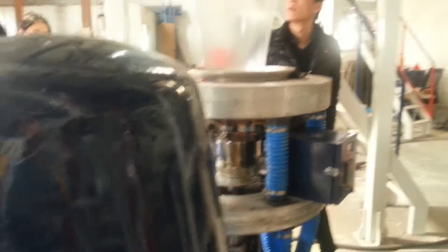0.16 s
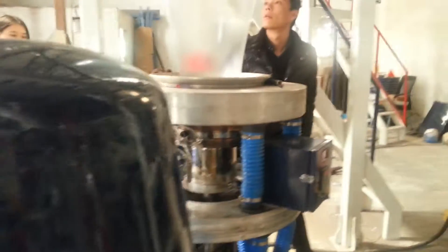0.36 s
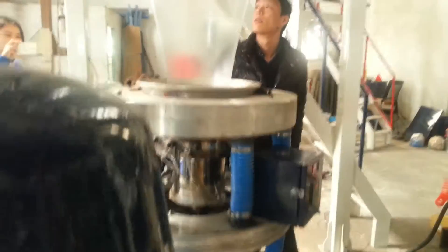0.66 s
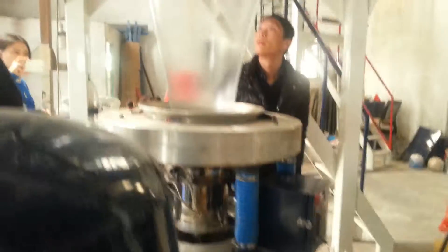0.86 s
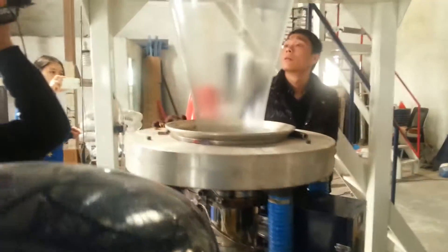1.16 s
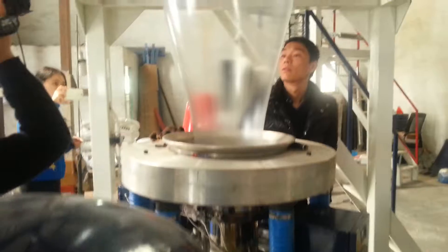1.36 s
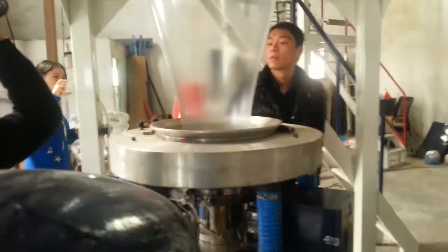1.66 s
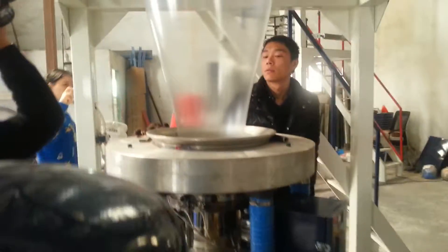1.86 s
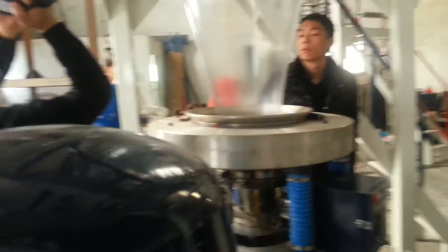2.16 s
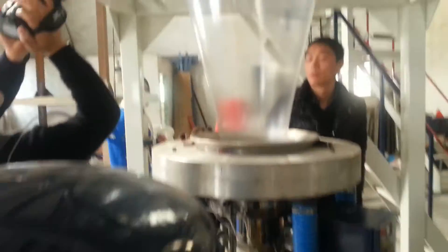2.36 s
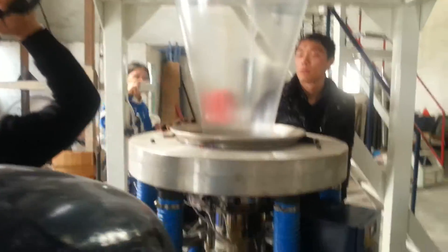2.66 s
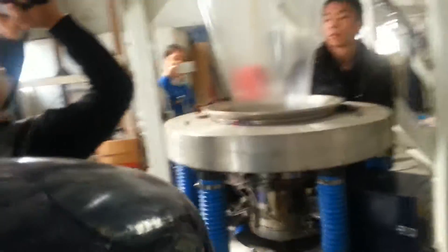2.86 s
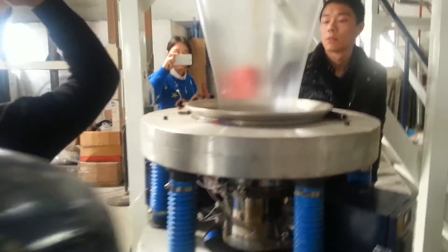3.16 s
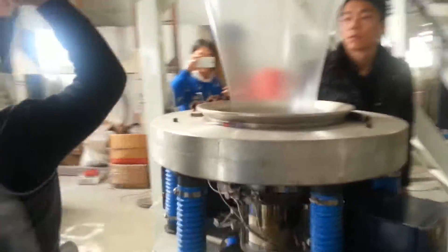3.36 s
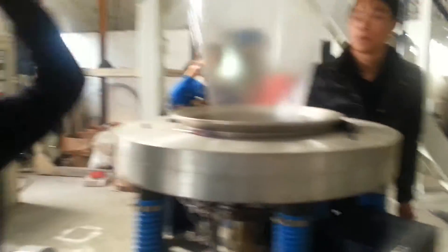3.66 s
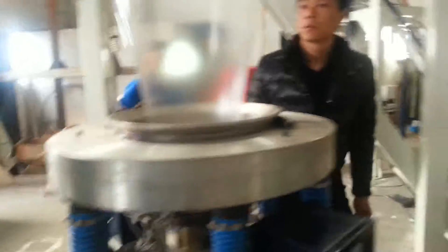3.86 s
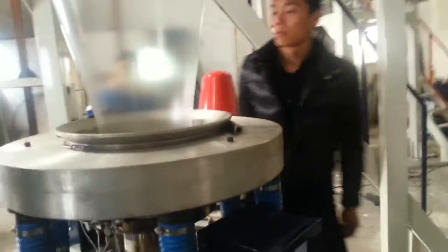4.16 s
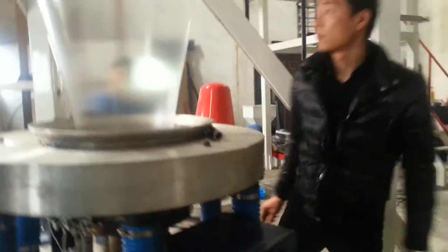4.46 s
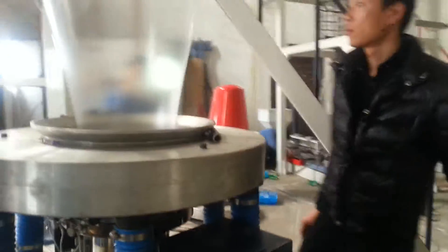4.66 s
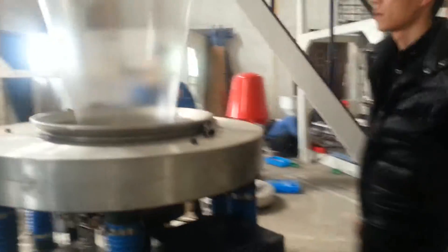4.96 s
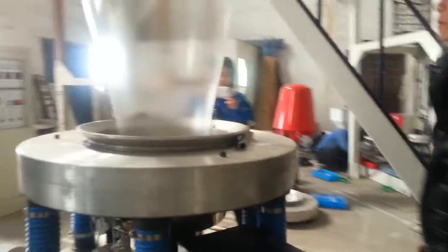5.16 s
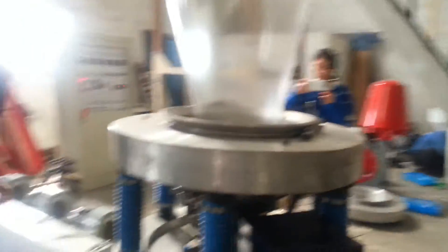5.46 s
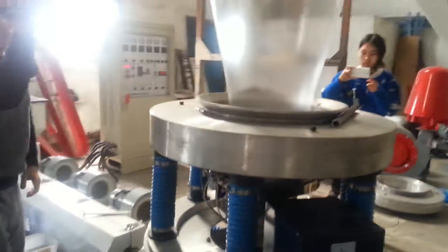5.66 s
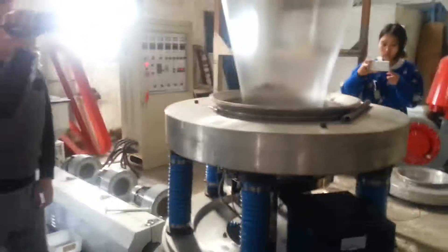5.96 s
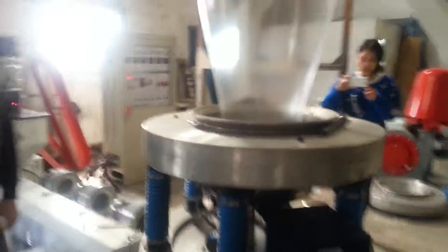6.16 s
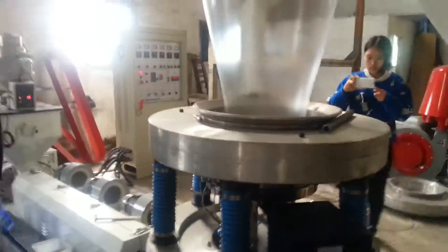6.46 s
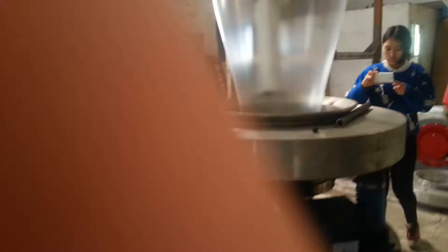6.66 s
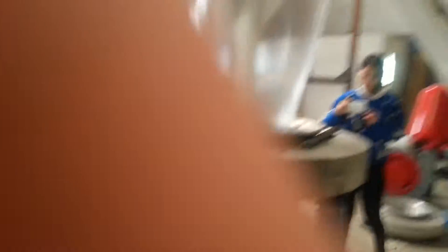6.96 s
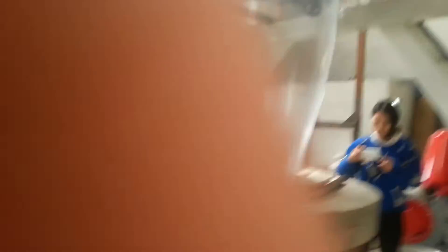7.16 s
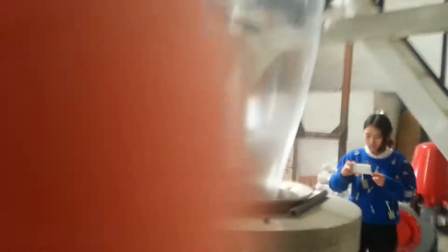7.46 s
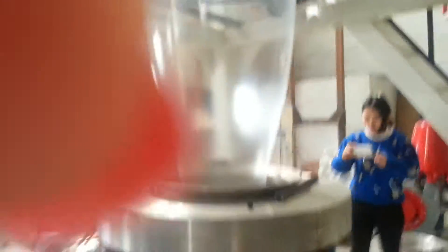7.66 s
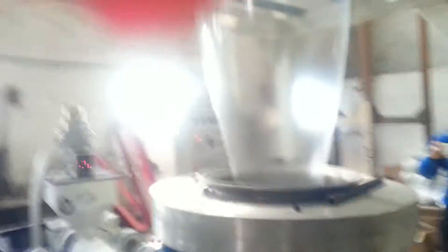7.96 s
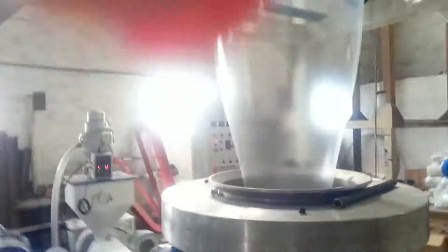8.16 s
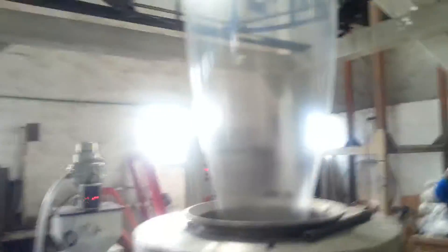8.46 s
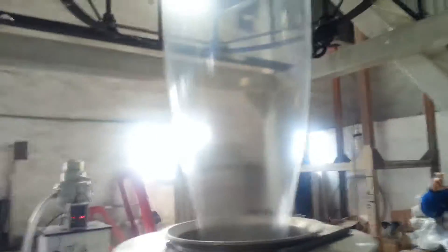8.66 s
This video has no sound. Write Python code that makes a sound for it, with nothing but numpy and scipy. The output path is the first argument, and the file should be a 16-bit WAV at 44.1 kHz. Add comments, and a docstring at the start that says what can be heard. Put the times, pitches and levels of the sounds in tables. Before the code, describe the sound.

A factory machine runs steadily with a high whistling air hiss over a low motor hum in a large hall.

```python
"""A whistling hiss and a steady hum come first: a blown-film extruder running in a large hall,
heard from a pair of microphones carried round it. Motor and blower hum, air rumbles in the hoses
and hisses from the slit of the cooling ring, and the speed drive whines near 8 kHz.
A faint falling squeal passes once, near three seconds. The right microphone is screened
from the hiss until the listener turns, about six seconds in."""
import sys
import numpy as np
from scipy import signal
from scipy.fft import rfft, irfft, next_fast_len
from scipy.io import wavfile
from scipy.ndimage import uniform_filter1d, minimum_filter1d, map_coordinates

SR = 44100
rng = np.random.default_rng(int(sys.argv[2]) if len(sys.argv) > 2 else 0)


def store_pcm(level_fs):
    """Save levels as 16-bit WAV."""
    pcm = np.round(np.clip(level_fs, -1, 1) * 32767).astype(np.int16)
    wavfile.write(sys.argv[1], SR, np.atleast_2d(pcm).T)


N = 388080

# Levels in the tables are relative: each source adds its own gain. Balance is left over right.
# Whistling hiss of the slit. Each row: time in seconds, core level in dB, skirt level in dB.
SLIT_LEVELS = [(0.0, -15.5, -26), (1.8, -15.5, -24.5), (2.05, -15.5, -27), (2.45, -18, -21.5),
               (6.3, -16, -23), (6.7, -22, -19), (7.1, -23, -26), (7.5, -21, -29), (8.2, -20.0, -30),
               (8.8, -19, -26.0)]
# Colour of its core and of its wider skirt. Each row: frequency in Hz, level in dB.
SLIT_CORE_COLOUR = [(5400, -26), (5700, 3.5), (5830, 5.5), (6270, 8.5), (6420, -4), (6700, -29)]
SLIT_SKIRT_COLOUR = [(4400, -35), (4900, -6.5), (5300, -5), (5480, 4), (5750, -2), (6300, -20), (6500, 4.5),
                     (6750, -5), (7000, -14), (7800, -39)]
# The hiss moves with the listening angle. Each row: time in seconds, nominal centre in Hz.
SLIT_NOMINAL_CENTRE = [(0.0, 6124), (0.54, 6010), (5.37, 6036), (5.83, 5940), (7.01, 6275), (7.65, 6013),
                       (8.8, 6422)]
# Screening of the right microphone; each hiss takes a share. Each row: time in seconds, loss in dB.
RIGHT_SHADE = [(0.0, 14), (0.6, 16), (1.55, 10.5), (2.05, 15.0), (3.25, 16), (3.4, 18.5), (4.7, 16),
               (5.8, 17.5), (6.55, 4.0), (7.3, 2.5), (7.65, 10.5), (8.8, 5)]
# Fine spray of air and its narrowly beamed top. Each row: time in seconds, level in dB.
SPRAY_LEVEL = [(0, -36), (1.6, -37), (3.2, -36.5), (4.1, -39.5), (5.2, -40), (5.95, -41), (6.4, -37.6),
               (7.1, -37.5), (8.4, -36.5)]
SIZZLE_LEVEL = [(0, -37.5), (2.3, -38.5), (3.1, -42.6), (3.6, -65), (5.4, -71), (7.3, -57), (8.1, -68),
                (8.45, -37), (8.8, -39.8)]
# Their colours. Each row: frequency in Hz, level in dB.
SPRAY_SPECTRUM = [(3500, -20.5), (5200, -28), (6200, 0), (7300, 3.5), (7700, 1.5), (8400, -4.5),
                  (9200, -10.5), (10000, -15.5), (11500, -28), (13000, -75), (14400, -57)]
SIZZLE_SPECTRUM = [(8000, -2), (9500, -3.5), (10800, 2.5), (11600, -4), (12500, -6.5), (14400, -10)]

# Motor hum, walking through its standing waves. Each row: time in seconds, level in dB.
MOTOR_LEVEL = [(0.0, -21.0), (1.1, -23), (1.3, -21), (2.45, -20.5), (2.85, -21), (3.35, -27.5), (4.2, -24),
               (4.8, -25), (5.65, -20), (5.9, -22.5), (6.1, -20), (6.35, -22.5), (7.4, -20), (7.9, -21),
               (8.2, -23), (8.8, -23.0)]
# Blade tone of the blower. Each row: time in seconds, level in dB, balance in dB.
BLADE_LEVEL_PAN = [(0.0, -27.5, 5.0), (0.65, -25.0, 6.0), (1.6, -27, 9.5), (2.3, -27, 10), (3.0, -22.5, 8),
                   (3.65, -21.0, 5.5), (4.7, -22, 2), (4.95, -24.5, 0.5), (5.65, -26.0, 8),
                   (7.1, -20.5, 5.5), (7.35, -22.0, 5.5), (8.4, -20, -0.5), (8.8, -21.5, 2)]
# Higher hum of the windings. Each row: time in seconds, level in dB.
WINDING_LEVEL = [(0, -29), (.6, -30.5), (1.1, -25), (1.9, -28), (2.3, -31), (3.3, -28.5), (3.7, -60),
                 (4.9, -32), (6.2, -48.5), (6.6, -34.5), (7.2, -26.5), (7.6, -47), (8.8, -33)]
# Weak tones of the gearbox. Each row: frequency in Hz, level in dB.
GEAR_TONES = [(193, -47), (254, -43), (269, -43), (289, -44), (349, -42), (544, -40), (819, -50),
              (890, -50), (965, -49), (1570, -51)]
# Resonances of blower casing and hoses, of the frame and of the guards.
# Each row: frequency in Hz, half-width in Hz, level in dB.
CASING_RESONANCES = [(432, 19.6, -1.5), (506.7, 15, -1.5), (538, 15, 3), (628, 53, -10.5)]
FRAME_RESONANCES = [(320.2, 8.4, -1.5), (329.5, 4, -7), (619.3, 13.6, -4.5)]
GUARD_RESONANCES = [(816, 50, -2.5), (931, 31, 0), (1050, 20, 3.5)]
# Rumble of the hall. Each row: frequency in Hz, level in dB.
HALL_SPECTRUM = [(20, -40), (36, -33), (47, -16), (58, -16.5), (80, -8), (135, 0), (165, 1.5), (210, -1.5),
                 (270, 2.5), (380, 0), (470, 2.5), (570, -7), (690, -2.5), (780, -19.5), (1300, -20.5)]

# Cooling air: the broad rush, louder close up, the hollow duct, and the sweep up the film tube.
# Each row: time in seconds, level in dB.
RUSH_LEVEL = [(0.0, -24), (2.3, -25), (2.8, -24.0), (4.15, -25.5), (4.5, -23), (5.25, -23), (6.25, -22.5),
              (7.7, -23), (8.8, -19.5)]
DUCT_LEVEL = [(0, -37), (2.8, -32), (4.1, -34), (4.55, -29.5), (5.2, -36), (6.1, -27), (7.6, -33.5),
              (8.1, -25.5), (8.8, -27)]
SWEEP_LEVEL = [(0.0, -29.5), (2.25, -29.5), (2.65, -27.0), (5.2, -24), (5.85, -28), (6.3, -28.5),
               (7.5, -23), (7.7, -24.5), (8.8, -26.5)]
# Colours of rush and sweep. Each row: frequency in Hz, level in dB.
RUSH_SPECTRUM = [(400, -13.5), (750, -2.5), (1000, -2.5), (1200, 0.5), (1800, 2.5), (2100, 2.5),
                 (2500, -3.5), (3300, -7.5), (4400, -8.5), (6500, -34), (12000, -54.5)]
SWEEP_SPECTRUM = [(2000, -14), (3100, 0), (3500, -3.5), (3770, -1), (4100, -2.5), (4400, -0.5), (4900, 1.5),
                  (5500, 2.5), (6500, -17), (8000, -28), (12000, -57)]
# Air ring cavity, heard from certain angles. Each row: time in seconds, level in dB, balance in dB.
CAVITY_LEVEL_PAN = [(0, -33, 10), (2.1, -33, 8), (2.9, -32.5, 6), (4.15, -32.5, 14), (4.8, -33, 16),
                    (5.9, -30.6, 7), (6.45, -24.4, 0), (7.0, -31.5, 0), (8.2, -27.5, -18), (8.55, -36, 1)]
# Resonances of duct and cavity. Each row: frequency in Hz, half-width in Hz, level in dB.
DUCT_RESONANCES = [(1358, 41, 0), (1494, 24, 6.5), (2070, 62, -5.5)]
CAVITY_RESONANCES = [(2360, 150, -0.5), (2543, 37, 2.5), (2705, 85, -1), (2860, 200, -6), (3140, 120, -9)]

# Switching sidebands of the speed drive: their frequencies in Hz, then their levels in dB.
SIDEBAND_HZ = [7787.5, 7872.4, 7957.2, 8042.1, 8126.9, 8211.7, 8381, 8466]
SIDEBAND_DB = [-52, -40.5, -42, -45.5, -41.5, -52, -52, -57]
# Faint falling squeal. Each row: time in seconds, pitch in Hz, level in dB.
SQUEAL_GLIDE = [(2.62, 1150, -70), (2.7, 960, -40), (2.78, 900, -42), (2.83, 820, -38), (2.9, 742, -35),
                (2.96, 707, -30), (3.05, 700, -70)]
# Bearing of the machine. Each row: time in seconds, lag at the left microphone in milliseconds.
LEFT_LAG = [(0, 0.098), (1.2, 0.02), (2.6, -0.059), (3.6, 0.016), (4.4, 0.14), (5.2, 0.16), (6.2, 0.27),
            (8.8, 0.17)]


def from_db(db):
    """Decibels to gain."""
    return 10 ** (np.asarray(db) / 20)


def rms_one(x):
    """Scale to unit power."""
    return x / np.sqrt(np.mean(np.abs(x) ** 2) + 1e-20)


def in_time(rows):
    """Each column of a curve at every sample."""
    seconds, *columns = np.transpose(rows)
    return [np.interp(np.arange(N) / SR, seconds, column) for column in columns]


def swing(rows):
    """How far a curve stands above its mean."""
    curve, = in_time(rows)
    return curve - np.mean(curve)


def bell(centre_s, width_s):
    """A smooth rise to 1 and fall back round one moment."""
    return np.exp(-np.minimum(((np.arange(N) / SR - centre_s) / width_s) ** 2, 20))


def drift(rate_hz):
    """Slow random wander with spread 1, drawn every hundredth sample and joined by straight lines."""
    pole = np.exp(-200 * np.pi * rate_hz / SR)
    white = rng.standard_normal(N // 100 + 2002)
    slow = rms_one(signal.lfilter([1], [1, -2 * pole, pole * pole], white)[2000:])
    ramp = np.arange(100) / 100
    return (slow[:-1, None] + np.diff(slow)[:, None] * ramp).ravel()[:N]


def bins():
    """Frequencies in Hz on which noise is shaped."""
    return np.maximum(np.fft.rfftfreq(next_fast_len(N), 1 / SR), 1)


def slope(points):
    """Gain per frequency through (Hz, dB) points, closed above the last."""
    hz, db = np.transpose(points)
    return from_db(np.interp(np.log(bins()), np.log(hz), db, right=-120))


def resonances(modes):
    """Gain per frequency of steep-sided resonances."""
    return sum(from_db(db) / (1 + ((bins() - hz) / width) ** 2) for hz, width, db in modes)


def ripple(depth_db, spacing_hz):
    """Fine peaks and notches that nearby metal surfaces leave in a spectrum."""
    steps = rng.standard_normal(2000)
    return from_db(depth_db * np.interp(bins() / spacing_hz, np.arange(len(steps)), steps))


def noise(colour, alike):
    """Coloured noise at the two microphones; alike is their correlation."""
    size = next_fast_len(N)
    mid, side = irfft(rfft(rng.standard_normal((2, size))) * colour, size)[:, :N]
    return rms_one(np.sqrt(1 + alike) * mid + np.sqrt(1 - alike) * side * [[1], [-1]])


def pan(balance_db):
    """Left and right gains of constant total power."""
    gains = from_db(np.array([[.5], [-.5]]) * balance_db)
    return gains / np.sqrt(np.mean(gains ** 2, axis=0))


def shaded(share, right_db):
    """Gains of the pair: the left microphone hears freely, the right loses a share of the shade."""
    shade_db, = in_time(RIGHT_SHADE)
    return np.array([np.ones(N), from_db(right_db - share * shade_db)])


def running_phase(hz):
    """Phase in radians of a changing frequency."""
    return 2 * np.pi * np.cumsum(hz) / SR


def hall_tone(hz, scatter, rate_hz):
    """A tone plus its hall reflections, which shift in strength and phase as the listener moves."""
    phase = 2 * np.pi * (np.arange(N) * hz / SR + rng.random())
    in_phase = (1 + scatter * drift(rate_hz)) * np.sin(phase)
    quadrature = scatter * drift(rate_hz) * np.cos(phase)
    return rms_one(in_phase + quadrature)


def slit():
    """Air shears off the ring's lip in a narrow band whose centre and width shift with the angle."""
    core_db, skirt_db = in_time(SLIT_LEVELS)
    core = from_db(core_db - 0.05) * noise(slope(SLIT_CORE_COLOUR), alike=0.03)
    skirt = from_db(skirt_db + 0.3) * noise(slope(SLIT_SKIRT_COLOUR), alike=0)
    shift_hz = 0.8 * swing(SLIT_NOMINAL_CENTRE)
    shifted = np.real(signal.hilbert(core + skirt) * np.exp(1j * running_phase(shift_hz)))
    return shifted * shaded(share=1.27, right_db=0.5)


def spray():
    """The finest eddies hiss above the slit's whistle."""
    spray_db, = in_time(SPRAY_LEVEL)
    sizzle_db, = in_time(SIZZLE_LEVEL)
    flicker_db = 0.5 * drift(12)
    metal = ripple(depth_db=2.4, spacing_hz=70)
    hiss = from_db(spray_db + 11.5 + flicker_db) * noise(slope(SPRAY_SPECTRUM) * metal, alike=0)
    sizzle = from_db(sizzle_db + 2.1 * drift(14)) * noise(slope(SIZZLE_SPECTRUM), alike=0)
    return hiss * shaded(share=0.79, right_db=10.5) + sizzle * pan(-15.5)


def hum():
    """Motor, blower blades, windings and gears send low tones through the hall, mostly to the left."""
    motor_db, = in_time(MOTOR_LEVEL)
    blade_db, blade_pan = in_time(BLADE_LEVEL_PAN)
    winding_db, = in_time(WINDING_LEVEL)
    motor = from_db(motor_db - 0.4) * hall_tone(hz=239.8, scatter=0.13, rate_hz=14)
    blades = from_db(blade_db + 2.22) * hall_tone(hz=495, scatter=0.012, rate_hz=4.5)
    windings = from_db(winding_db - 1.5) * hall_tone(hz=600, scatter=0.47, rate_hz=2.7)
    gears = sum(from_db(db) * hall_tone(hz, scatter=1, rate_hz=0.79) for hz, db in GEAR_TONES)
    return motor * pan(3.5) + blades * pan(blade_pan) + windings * pan(8.3) + gears * pan(5.1)


def rumble():
    """Turbulence rings in blower casing and frame, over the low roar of the hall."""
    blade_db, blade_pan = in_time(BLADE_LEVEL_PAN)
    casing = from_db(blade_db - 2.5) * noise(resonances(CASING_RESONANCES), alike=1)
    frame_db = -31.5 + 0.27 * swing(WINDING_LEVEL)
    frame = from_db(frame_db) * noise(resonances(FRAME_RESONANCES), alike=0.97)
    hall = from_db(-29 + 0.5 * drift(3.3)) * noise(slope(HALL_SPECTRUM), alike=1)
    return casing * pan(blade_pan) + frame * pan(4.5) + hall * pan(3.1)


def guards():
    """Thin panels on the machine drone with the air that passes them."""
    level_db = -36.5 + 1.24 * swing(RUSH_LEVEL)
    return from_db(level_db) * noise(resonances(GUARD_RESONANCES), alike=0.67) * pan(3.5)


def cooling_air():
    """Air rushes through duct and ring and up the film; the higher it sounds, the more diffuse it is."""
    duct_db, = in_time(DUCT_LEVEL)
    cavity_db, cavity_pan = in_time(CAVITY_LEVEL_PAN)
    sweep_db, = in_time(SWEEP_LEVEL)
    metal = ripple(depth_db=2, spacing_hz=30.53)
    rush_db = -25 + swing(RUSH_LEVEL) + 1.5 * drift(33)
    rush = from_db(rush_db) * noise(slope(RUSH_SPECTRUM) * metal, alike=0.43)
    duct = from_db(duct_db) * noise(resonances(DUCT_RESONANCES), alike=0.22)
    cavity = from_db(cavity_db) * noise(resonances(CAVITY_RESONANCES) * metal, alike=0.2)
    sweep = from_db(sweep_db + 3 + 1.54 * drift(33)) * noise(slope(SWEEP_SPECTRUM) * metal, alike=0.052)
    return ((rush + duct) * shaded(share=0.27, right_db=-3)
            + cavity * pan(cavity_pan)
            + sweep * shaded(share=0.97, right_db=2.2))


def speed_drive():
    """Switching tones sing in the motor; standing waves make each swell and fade at each microphone."""
    whine = np.zeros((2, N))
    for microphone in whine:
        for hz, db in zip(SIDEBAND_HZ, SIDEBAND_DB):
            microphone += from_db(db + 1) * hall_tone(hz, scatter=1, rate_hz=2.5)
    return whine * shaded(share=0.34, right_db=6.5)


def squeal():
    """One thin tone glides down, roughened and blurred by the hall, under a short steady squeak."""
    hz, level_db = in_time(SQUEAL_GLIDE)
    blur = noise(resonances([(50, 53, 0)]), alike=0.72)
    glide = from_db(level_db + 4.5) * rms_one(blur + 0.88) * np.sqrt(2) * np.sin(running_phase(hz))
    squeak_gain = from_db(-35) * bell(centre_s=2.74, width_s=0.1)
    squeak = squeak_gain * hall_tone(hz=1580, scatter=0.4, rate_hz=8)
    return (glide + squeak) * pan(4)


def from_bearing(x):
    """The path to the left microphone changes as the listener turns."""
    lag_ms, = in_time(LEFT_LAG)
    left = map_coordinates(x[0], [np.arange(N) - lag_ms * SR / 1000], order=3, mode="nearest")
    return np.array([left, x[1]])


def limiter(x, ceiling=0.93, release_db_per_s=120):
    """The gain ducks just ahead of the highest peaks and recovers quickly."""
    over_db = 20 * np.log10(np.maximum(np.abs(x).max(axis=0) / ceiling, 1))
    fall_db = release_db_per_s * np.arange(N) / SR
    held_db = np.maximum.accumulate(over_db + fall_db) - fall_db
    ahead_db = minimum_filter1d(-held_db, size=65)
    return x * from_db(uniform_filter1d(ahead_db, size=65))


def scene():
    """The machine on a walk round it; the air flow flutters as a whole, and the level dips once."""
    flutter = from_db(0.58 * drift(10))
    body = hum() + rumble() + flutter * (guards() + cooling_air()) + squeal()
    dip = from_db(-7.5 * bell(centre_s=5.342, width_s=0.0073))
    return dip * (from_bearing(body) + flutter * (slit() + spray()) + speed_drive())


def record(dry):
    """Behind the microphones the deepest bass is lost, peaks are limited and the top is cut steeply."""
    bass_cut = signal.butter(2, 34, "high", fs=SR, output="sos")
    top_cut = signal.ellip(10, 0.1, 80, 14450, fs=SR, output="sos")
    return signal.sosfilt(top_cut, limiter(signal.sosfilt(bass_cut, dry)))


dry = scene()
out = record(dry)
store_pcm(out)
```